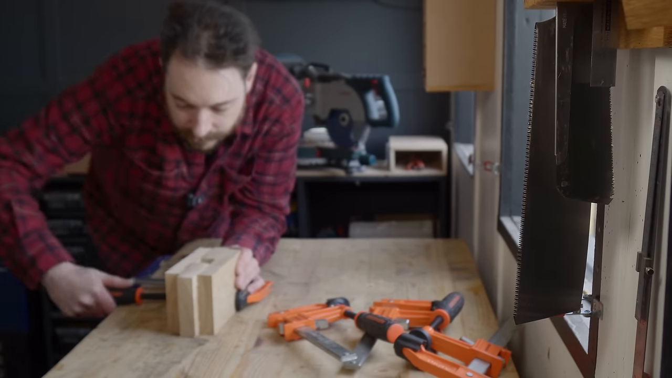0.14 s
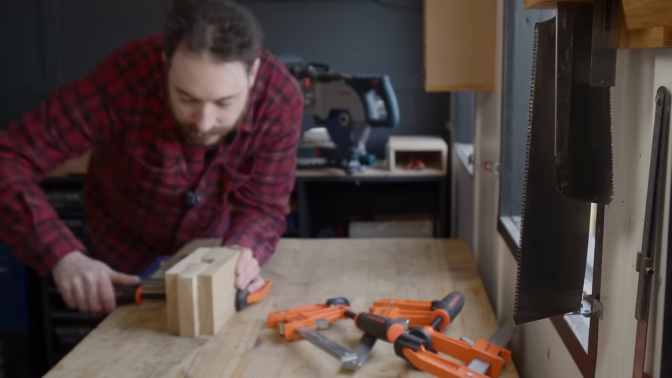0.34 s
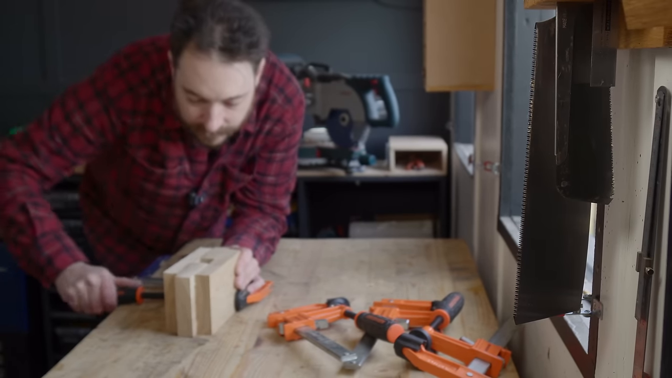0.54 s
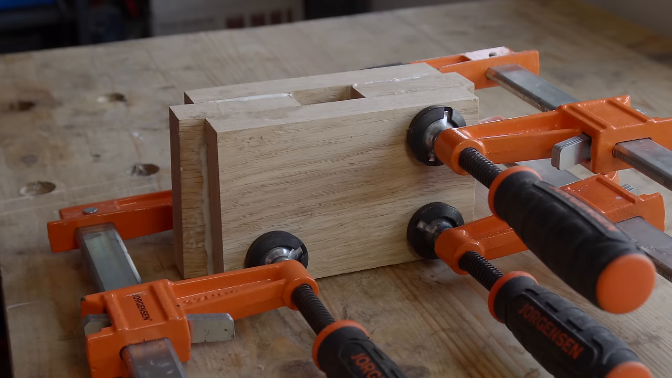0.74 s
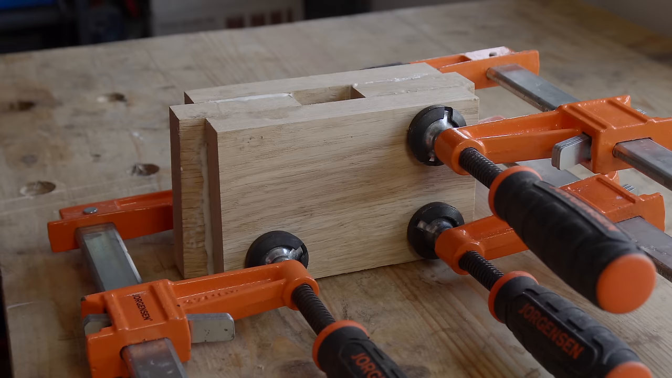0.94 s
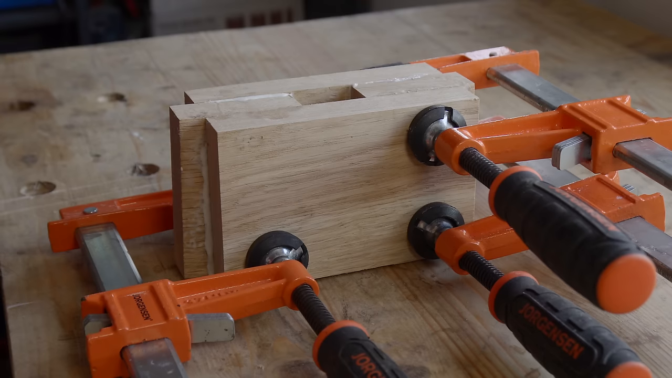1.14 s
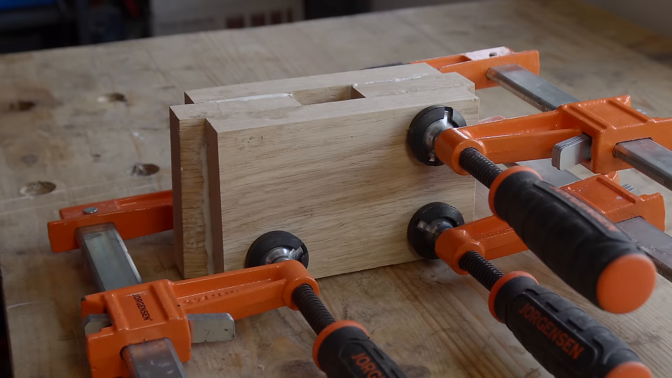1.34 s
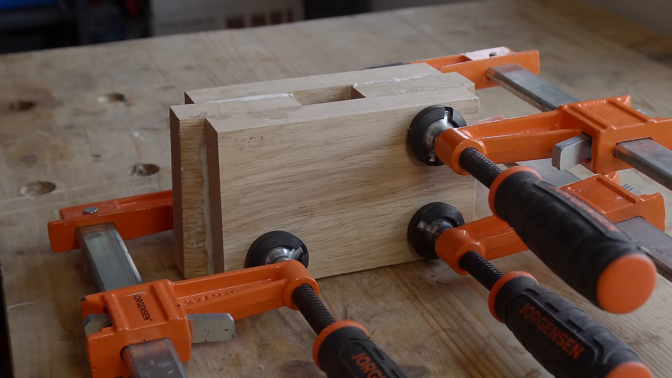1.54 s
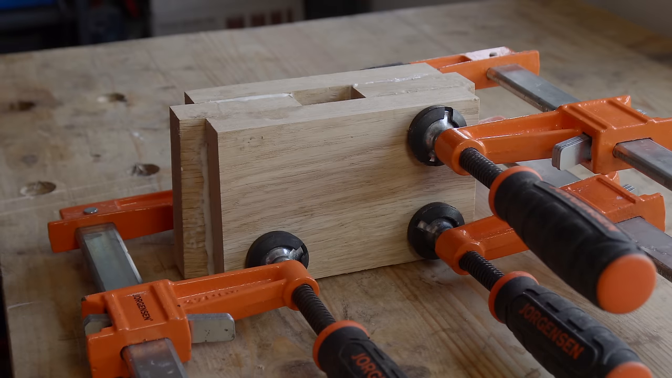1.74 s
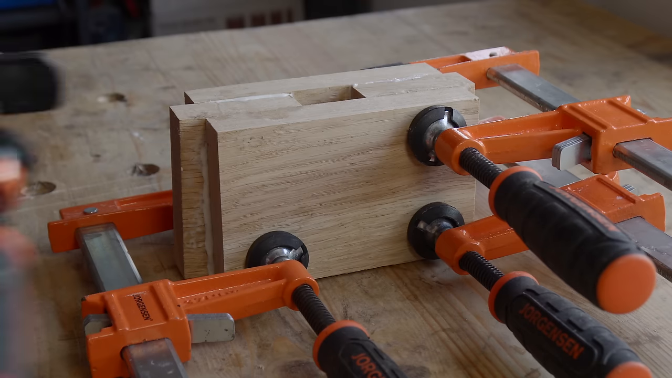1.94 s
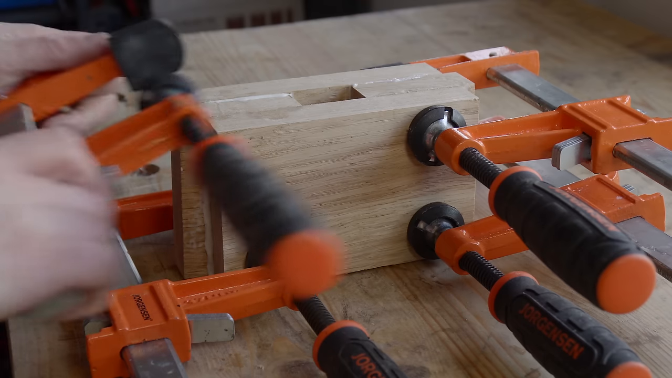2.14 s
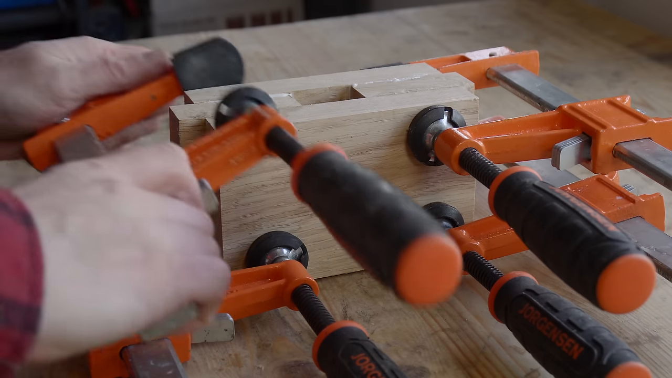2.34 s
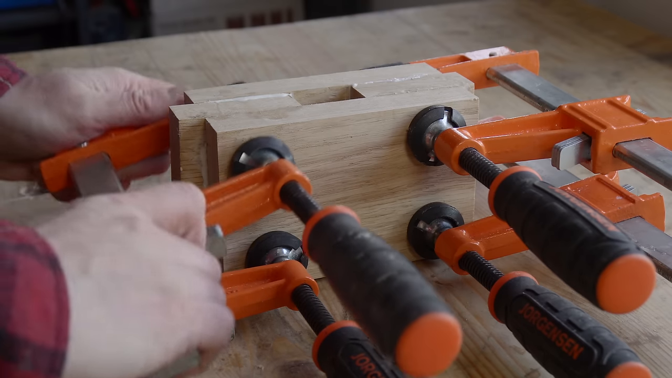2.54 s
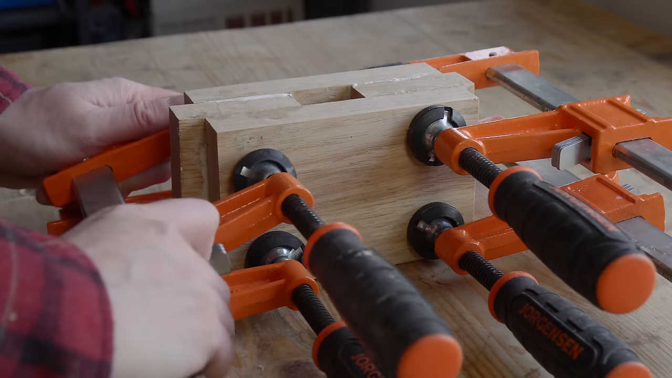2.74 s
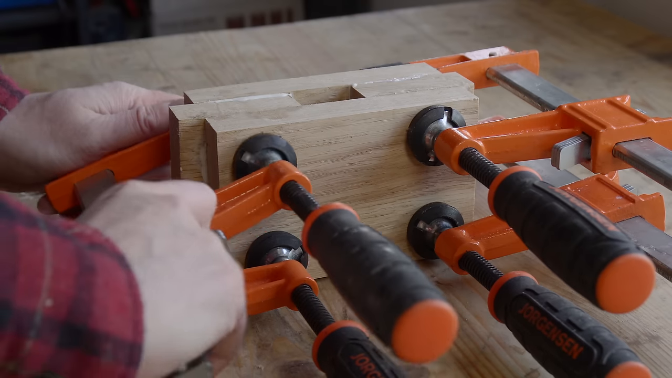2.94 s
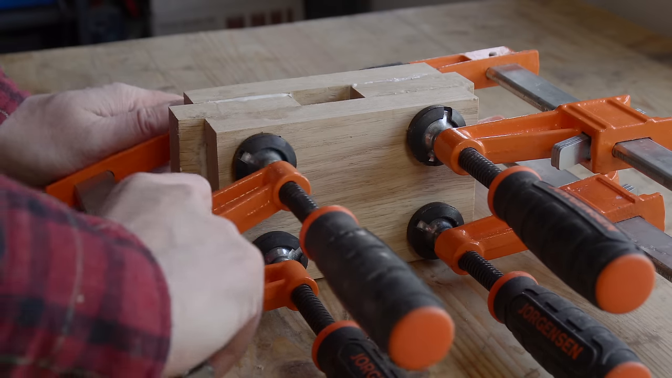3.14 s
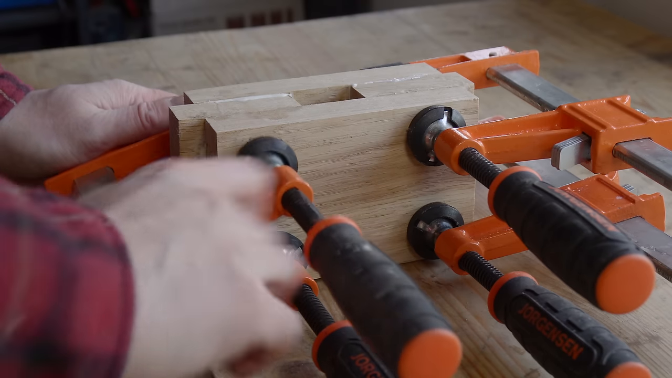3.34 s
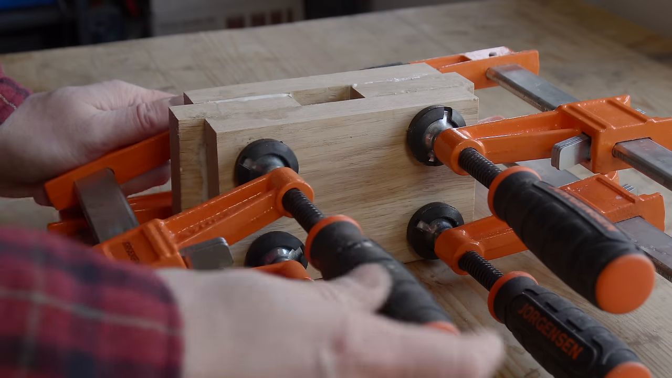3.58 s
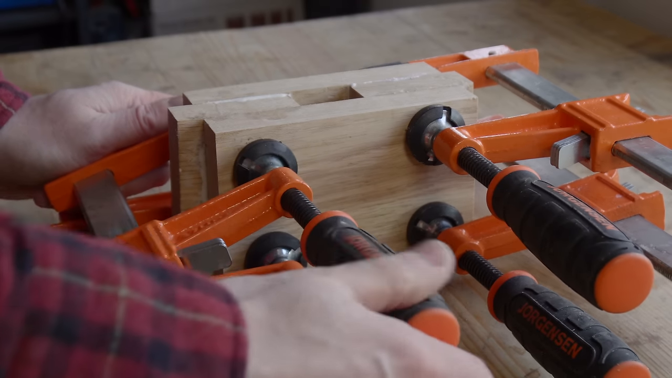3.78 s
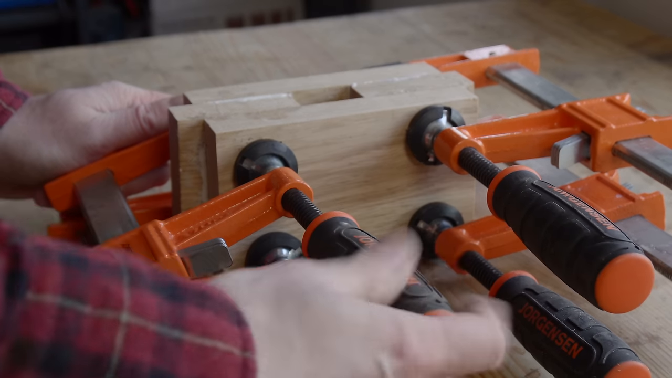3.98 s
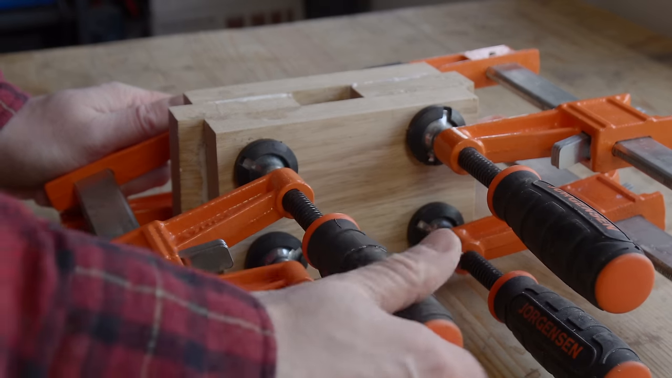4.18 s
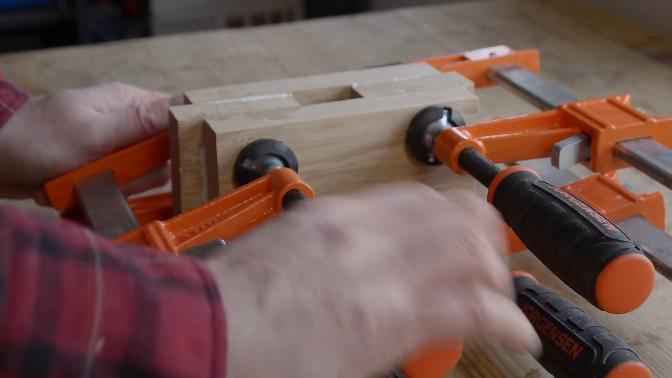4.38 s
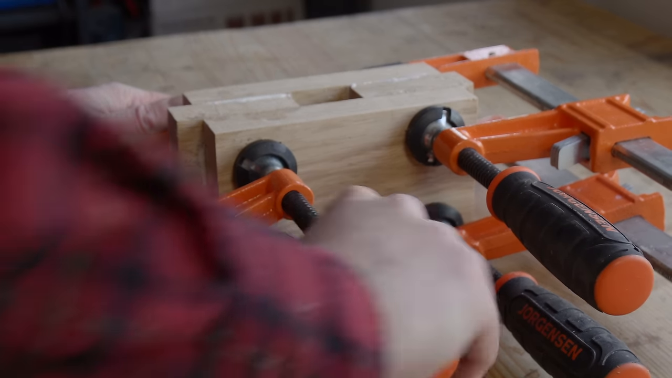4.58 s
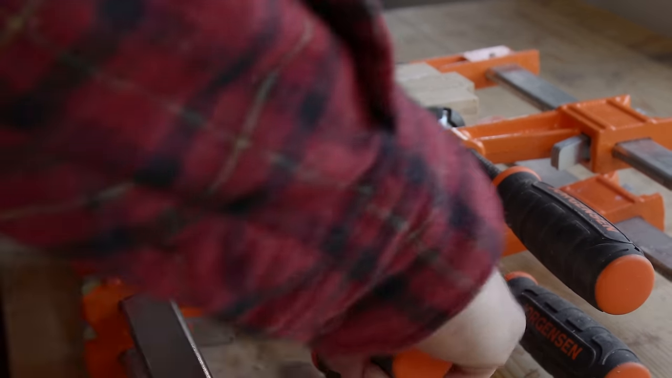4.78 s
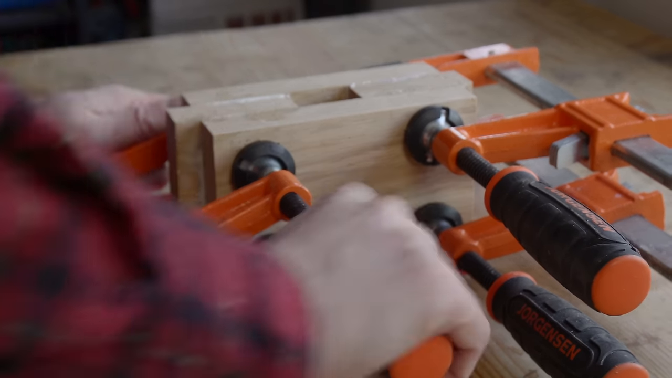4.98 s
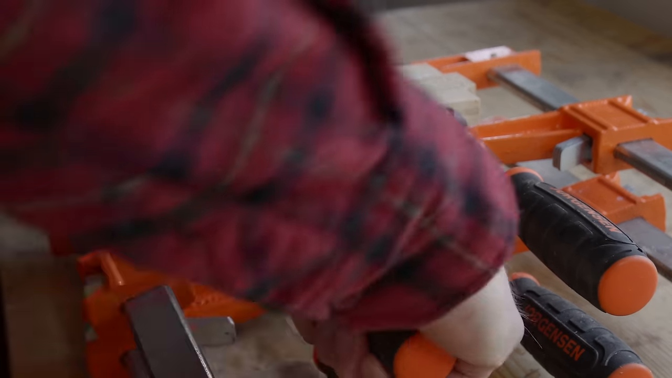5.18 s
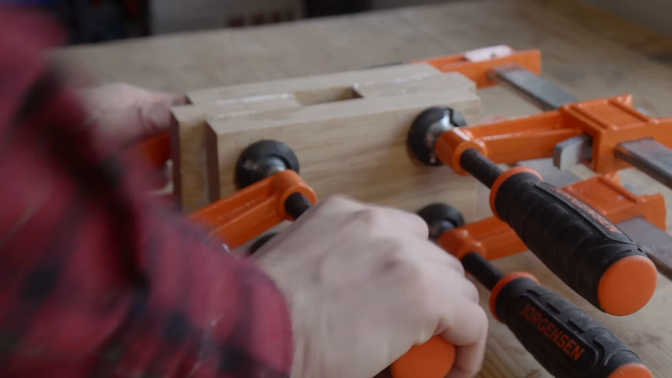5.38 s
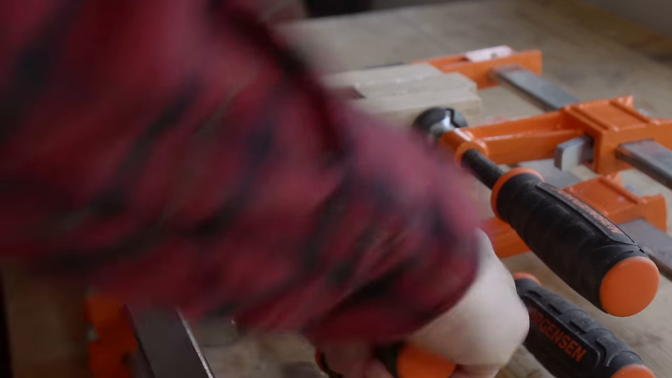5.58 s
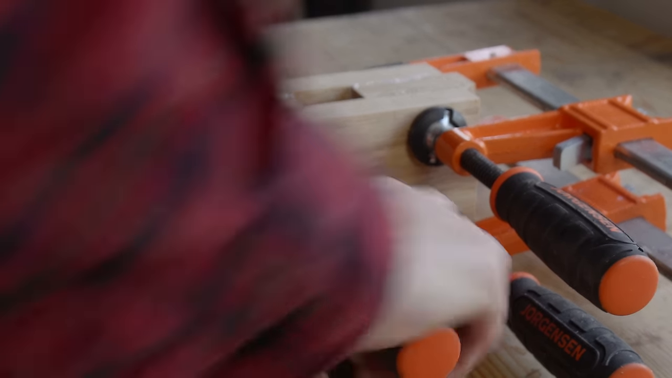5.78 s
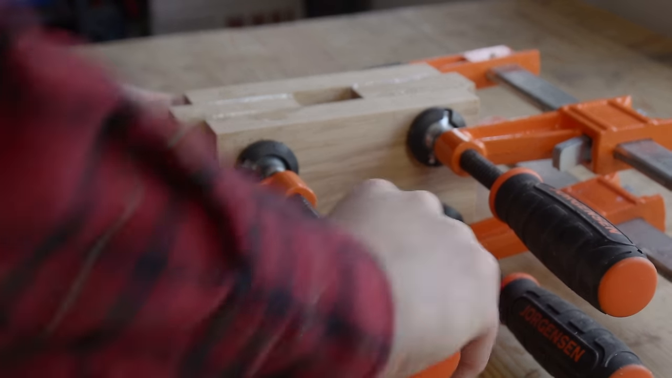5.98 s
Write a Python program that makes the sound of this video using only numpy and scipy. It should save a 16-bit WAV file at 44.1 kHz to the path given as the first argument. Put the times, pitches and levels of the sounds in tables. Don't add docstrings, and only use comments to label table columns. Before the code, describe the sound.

Faint rubbing and a low squeak open the scene, then steel bars chatter and drag on one another a little way off. Wood knocks follow, and a sliding jaw clanks home, the loudest moment, with a brief bright ring. After one more firm tap come close skin and cloth rubs, tiny squeaks, a sharp click, bench rumble and three muted wooden slips. Short, diffuse workshop room; the hands are near the microphone.

```python
import sys
import numpy as np
from scipy import signal
from scipy.fft import rfft, irfft
from scipy.io import wavfile
from scipy.ndimage import uniform_filter1d

SR = 44100
rng = np.random.default_rng(int(sys.argv[2]) if len(sys.argv) > 2 else 0)


def unload_wav(signal):
    wavfile.write(
        sys.argv[1],
        SR,
        np.round(np.clip(np.atleast_2d(signal).T, -1, 1) * 32767).astype(np.int16),
    )


def magnitude_from_level(level_db):
    exponent = np.asarray(level_db, float) / 20
    return 10 ** exponent


N = 265614
HEAP_UNTIL_S, GRIPPED_FROM_S = 2.2, 3.5


def rms_one(x):
    return x / np.sqrt(np.mean(x ** 2) + 1e-20)


def filtered(x, order, cut_hz, kind):
    return signal.sosfilt(signal.butter(order, cut_hz, kind, fs=SR, output="sos"), x)


def at_hz(points, hz):
    points_hz, values = np.transpose(points)
    return np.interp(np.log(hz), np.log(points_hz), values)


def coloured(x, spectrum):
    hz = np.maximum(np.fft.rfftfreq(len(x), 1 / SR), 1)
    return rms_one(irfft(rfft(x) * magnitude_from_level(at_hz(spectrum, hz)), len(x)))


def tilted(x, tilt_db, hinge_hz):
    low = filtered(x, 2, hinge_hz, "low")
    return magnitude_from_level(-tilt_db) * low + magnitude_from_level(tilt_db) * (x - low)


def ring(clicks, hz, t60):
    r, w = magnitude_from_level(-60 / (t60 * SR)), 2 * np.pi * hz / SR
    return signal.lfilter([0, np.sin(w)], [1, -2 * r * np.cos(w), r * r], clicks + 1e-18)


def body(drive, modes):
    return sum((-1) ** k * magnitude_from_level(db) * ring(drive, hz, t60) for k, (hz, db, t60) in enumerate(modes))


def click(s, db):
    return magnitude_from_level(db) * (np.arange(N) == int(s * SR)) + 1e-18


def grains(per_s, spread_db):
    sizes = magnitude_from_level(spread_db * np.minimum(rng.exponential(1, N), 5)) * rng.choice([-1, 1], N)
    return sizes * (rng.random(N) < per_s / SR)


def flutter(per_s, depth_db):
    steps = rng.standard_normal(1000)
    return magnitude_from_level(depth_db * np.interp(np.arange(N) / SR * per_s, np.arange(1000), steps))


def strokes(rows):
    t = np.arange(0, N + 32, 32) / SR
    gain = 0
    for s, db, rise, fall in rows:
        progress = np.where(t < s, (s - t) / rise, (t - s) / fall)
        gain = gain + magnitude_from_level(db - 20 * progress ** 1.3)
    return np.interp(np.arange(N) / SR, t, gain)


def by_stage(heap_db, block_db, gripped_db):
    t = np.arange(N) / SR
    return magnitude_from_level(np.select([t < HEAP_UNTIL_S, t < GRIPPED_FROM_S], [heap_db, block_db], gripped_db))


# hz, level_db
AIR = [(12, -25), (20, -3.5), (43, -3.5), (434, -2.5), (738, -0.5), (1330, -8.5), (6180, -18.5),
       (7310, -16.5), (14300, -25), (16000, -42)]


def room_tone():
    return magnitude_from_level(-75.5) * coloured(rng.standard_normal(N), AIR)


# peak_s, rocking_db
LEANS = [(.1, -65), (.6, -63.5), (.78, -60.5), (2.73, -54.5), (3.11, -43), (3.401, -53.5), (3.62, -58),
         (3.92, -62), (4.18, -50.5), (4.449, -60.5), (4.65, -51.5), (4.83, -51), (5.131, -43), (5.302, -58),
         (5.581, -46), (5.739, -55), (6.02, -44.5)]


def bench_rocking():
    sway = ring(rng.standard_normal(N), 28.6, 0.93)
    sway = sway / np.sqrt(uniform_filter1d(sway ** 2, size=3000) + 1e-9)
    rocking = sway + magnitude_from_level(-13.0) * rms_one(ring(rng.standard_normal(N), 32, 0.21))
    shudder = rms_one(ring(rng.standard_normal(N), 74, 0.45))
    rocking += by_stage(-16, -23, -11.5) * shudder
    rise_s, fall_s, at_rest_db = 0.13, 0.18, -79.5
    lean = magnitude_from_level(at_rest_db) + strokes([(s, db, rise_s, fall_s) for s, db in LEANS])
    return lean * rms_one(rocking)


# pitch_hz, level_db, t60_s
WOOD = [(99, -13.5, 0.99), (142, -29, 0.11), (190, -6.5, 0.036), (202, -3, 0.28), (236, -11, 0.089),
        (275, -1.5, 0.19), (315, -2.5, 0.092), (362.8, -3.5, 0.087), (460, -12, 0.008), (514, -4.5, 0.12),
        (554, -3, 0.038), (670, 1, 0.037), (794, -8.5, 0.068), (883, -13, 0.18), (1048.7, -15.5, 0.051),
        (1220, -12, 0.03)]
# peak_s, level_db, rise_s, fall_s
SHIFTS = [(0.03, -58.5, 0.33, 0.12), (.19, -65.5, 0.21, 0.63), (1.07, -60.5, 0.093, 0.41),
          (1.5, -74.5, 0.16, 0.89), (2.62, -70, 0.15, 0.28), (2.97, -55, 0.13, 0.084),
          (3.08, -41, 0.073, 0.027), (3.36, -64, 0.038, 0.03), (3.44, -49.5, 0.056, 0.12),
          (3.75, -61.5, 0.21, 0.47), (4.09, -63, 0.062, 0.37), (4.58, -57.5, 0.14, 0.31),
          (4.86, -72, 0.077, 0.09), (4.99, -60.5, 0.15, 0.24), (5.27, -54, 0.36, 0.16),
          (5.67, -48, 0.28, 0.22), (5.9, -61, 0.16, 0.44)]


def block_shifts():
    stutter = grains(2500, spread_db=2.0) * flutter(30, depth_db=2.5)
    rubbing = sum(magnitude_from_level(db) * ring(stutter, hz, 0.69 * t60) for hz, db, t60 in WOOD)
    return magnitude_from_level(-4.5) * strokes(SHIFTS) * rms_one(rubbing)


# hz, density_db per Hz
PALM = [(880, -34.5), (1500, -8.5), (2000, -13), (3030, -4), (3380, -7), (7610, -6), (9850, -11.5),
        (14500, -12.5), (16000, -23.5)]
# peak_s, level_db, rise_s, fall_s
RUBS = [(0.0, -79, 0.29, 0.17), (.168, -81, 0.018, 0.073), (.51, -77.5, 0.26, 0.11),
        (.628, -84, 0.012, 0.058), (.73, -70, 0.048, 0.25), (2.24, -78.5, 0.93, 0.18),
        (3.34, -74, 0.081, 0.28), (3.69, -72, 0.066, 0.067), (3.79, -72, 0.076, 0.097),
        (3.87, -74, 0.081, 0.066), (3.975, -74, 0.02, 0.036), (4.08, -68, 0.017, 0.041),
        (4.13, -73.5, 0.017, 0.09), (4.195, -68.5, 0.059, 0.032), (4.27, -68, 0.046, 0.11),
        (4.375, -60, 0.035, 0.037), (4.5, -68, 0.053, 0.067), (4.6, -61.5, 0.075, 0.096),
        (4.8, -67, 0.11, 0.056), (5.18, -75.5, 0.16, 0.11)]
# start_s, effort_db
TURNS = [
    (5.055, -0.5),
    (5.508, 1),
    (5.976, 2),
]
# after_turn_s, level_db, rise_s, fall_s
TURN = [
    (-.15, -64.5, 0.052, 0.12),
    (0., -61, 0.027, 0.088),
]


def palm_rubs():
    rubs = list(RUBS)
    for s, effort_db in TURNS:
        rubs += [(s + lead, db + effort_db, rise, fall) for lead, db, rise, fall in TURN]
    palm = coloured(grains(12000, spread_db=1.5) * flutter(60, depth_db=2.5), PALM)
    return magnitude_from_level(1.5) * strokes(rubs) * tilted(palm, -1, 5200)


# peak_s, level_db, rise_s, fall_s
SCUFFS = [(0.0, -64.5, 0.12, 0.18), (.17, -63, 0.083, 0.14), (.51, -58.5, 0.091, 0.11),
          (.627, -57, 0.0063, 0.054), (.8, -64, 0.2, 0.15), (2.0, -70, 0.48, 0.67), (3.7, -69, 0.27, 0.94),
          (4.1, -79.5, 0.059, 0.53), (4.36, -67, 0.1, 0.12), (4.55, -68.5, .1, 0.24),
          (4.82, -65.5, 0.1, 0.071), (5.22, -66.5, 0.23, 0.28), (5.287, -58.5, 0.0063, 0.074),
          (5.757, -52.5, 0.013, 0.087), (6.0, -64, 0.1, .1)]


def grip_scuffs():
    jerks = grains(5000, spread_db=2.5) * flutter(50, depth_db=1.5)
    return magnitude_from_level(-8.0) * strokes(SCUFFS) * rms_one(filtered(jerks, 2, [700, 1900], "band"))


# start_s, length_s, pitch_hz, width_hz, level_db
SQUEAKS = [(0.066, 0.029, 1470, 52, -69), (0.12, 0.38, 1500, 52, -76.5), (0.096, 0.18, 430, 60.4, -64.5),
           (0.147, 0.59, 2990, 120, -85.5), (3.569, 0.53, 1720, 121.2, -73), (3.6, 0.5, 2186, 149.4, -76.5),
           (4.614, 0.13, 2650, 303, -75.5), (4.886, 0.058, 3030, 296, -66.5), (5.28, 0.093, 1304, 90, -70),
           (5.339, 0.057, 2980, 399, -65.5), (5.482, 0.11, 2790, 300, -67.5), (5.758, 0.093, 1282, 69, -65)]


def screw():
    thread, t = grains(3200, spread_db=1.5) * flutter(40, depth_db=2.5), np.arange(N) / SR
    out = np.zeros(N)
    for s, length, hz, width, db in SQUEAKS:
        t60 = 1.2 / width
        squeak = rms_one(ring(ring(thread, hz, t60), hz, t60))
        swell = np.sin(np.pi * np.sqrt(np.clip((t - s) / length, 0, 1)))
        out += magnitude_from_level(db) * swell * squeak
    return out


# start_s, peak_db, loudest_pitch_hz, judder_ms
KNOCKS = [(0.466, -53.5, 600, 16), (0.494, -49.5, 296, 59), (0.528, -47.5, 290, 18), (0.623, -44, 332, 11),
          (1.027, -44, 1090, 19), (2.518, -42, 1037, 29), (2.52, -51, 250, 20), (2.621, -40, 265, 14.5),
          (2.847, -47, 262, 15), (2.923, -38, 282, 23), (2.976, -32.5, 257, 12), (3.002, -24, 347, 19),
          (3.408, -33.5, 560, 12.6), (3.41, -37, 197, 26), (3.738, -53, 202, 10.5), (4.065, -46.5, 205, 18),
          (4.351, -48, 286, 9.2), (4.355, -42, 1070, 36), (4.374, -39.5, 212, 16), (4.52, -41, 291, 9.6),
          (4.822, -50.5, 257, 6.4), (4.925, -46.5, 171, 6.5), (5.432, -43, 514, 9.5),
          (5.845, -44.5, 280.4, 5.8)]


def knocks():
    t, drive = np.arange(4096) / SR, np.zeros(N)
    for s, peak_db, top_hz, ms in KNOCKS:
        judder = rng.standard_normal(4096) * np.exp(-1000 * t / ms)
        force = (t == 0) + 0.059 * judder
        blow = filtered(force, 2, [top_hz / 2.0, top_hz * 1.89], "band")
        drive[int((s + .003) * SR):][:4096] += magnitude_from_level(peak_db) * blow
    thud = sum(magnitude_from_level(db - 9.5) * ring(drive, hz, 0.34 * t60) for hz, db, t60 in WOOD)
    return filtered(thud + magnitude_from_level(-15.5) * body(drive, WOOD), 3, [125, 1350], "band")


# pitch_hz, level_db
STEEL = [(1580, -13.5), (1860, -21), (2040, -12.5), (2480, -5), (2800, -3), (3100, -3.5), (3680, -14.5),
         (4280, -4), (4660, 2.5), (5220, -4.5), (5490, -9.5), (6050, -3), (6620, -3.5), (7170, -3.5),
         (7650, -5), (7950, 2), (8610, -2), (9450, 1.5), (10300, -3), (11400, -6.5), (11900, -4),
         (12350, -2.5), (13800, -10.5), (14500, -22)]
# start_s, peak_db, loudest_pitch_hz, treble_fall_db per octave, chatter_ms
HEAP_CLINKS = [(0.4688, -56, 1155, 45, 2.9), (0.6241, -57.5, 2060, 5.5, 7), (0.9946, -37.5, 7050, 15, 2.6),
               (1.1617, -29.5, 4900, 8, 0.68), (1.1796, -35.5, 2850, 4, 5.1), (1.1977, -39, 2560, 13, 2.4),
               (1.2682, -29.5, 7600, 14.5, 2.5), (1.5, -44, 3080, 7, 4.8), (1.539, -36.5, 2610, 3.5, 0.44),
               (1.5613, -44.5, 2950, 3.5, 2.3), (1.671, -56, 4860, 11, 2.8), (1.702, -42, 4900, -1.5, 4.5),
               (1.7489, -32.5, 6400, 1.5, 3.9), (1.7986, -28, 3300, 7, 0.77),
               (1.8315, -29.5, 2420, 6.5, 1.04), (1.8357, -32, 4510, 3.5, 1.4),
               (1.8508, -43.5, 2370, 7, 1.9)]
# start_s, peak_db, loudest_pitch_hz, treble_fall_db, chatter_ms
BLOCK_CLINKS = [(2.524, -56.5, 2800, 8, 1.4), (2.5456, -53.5, 2990, 10, 4.5), (2.572, -49.5, 2690, 10, 1.3),
                (2.5927, -51.5, 3180, 15, 2.2), (2.6276, -46, 2470, 3, 3.1), (2.851, -23, 4110, 6.5, 1.8),
                (2.8559, -25.5, 6660, -1, 4.8), (2.915, -47.5, 4270, 6, 2.5), (2.9155, -46.5, 1190, 9, 1.8),
                (2.9364, -40.5, 3980, 13, 1.9), (2.9523, -18.5, 4000, -2, 5), (3.0052, -3.5, 11400, 7, 1.7),
                (3.0098, -12.5, 11500, 15.5, 2.6), (3.4111, -34.5, 6330, 33, 1.4),
                (3.411, -33, 1525, 12.5, 4.7), (4.1833, -43.5, 1924, 3, 1.44),
                (4.7398, -50.5, 2000, 5.5, 2.25), (4.778, -40.5, 4300, 5.5, 1.2),
                (4.7812, -46.5, 3000, 5.5, 3.3), (5.1164, -45, 4810, 24.5, 2.2),
                (5.6512, -51.5, 4300, 3, 2.2), (5.655, -48, 3000, 6.5, 4)]
# start_s, peak_db, loudest_pitch_hz, treble_fall_db per octave
BOUNCES = [(1.0298, -15, 4400, 5), (1.0303, -9, 11700, 5), (1.0326, -3, 11700, 5), (1.038, -14, 9500, 5),
           (1.0434, -15, 9500, 5), (1.0542, -12, 11600, 5), (1.0672, -13, 5000, 4), (1.0786, -12, 5240, 9),
           (1.0885, -20, 4560, 9), (1.0985, -19, 5420, 7), (1.1108, -19, 3200, 6), (1.1263, -20, 2600, 4),
           (1.2935, -21, 5200, 9), (1.298, -21, 6000, 9)]
# start_s, peak_db, loudest_pitch_hz
CATCHES = [(1.191, -28.5, 4600), (1.214, -37, 2500), (1.2272, -38, 5000), (1.2439, -26, 3550),
           (1.2526, -18.5, 2480), (1.278, -25, 3850), (1.2882, -15, 8000), (1.2907, -27, 4630),
           (1.3053, -18.5, 3600), (1.321, -27, 6170), (1.335, -20, 4570), (1.343, -23, 5260),
           (1.509, -45.5, 6800), (1.516, -47, 1305), (1.531, -39, 2950), (1.55, -37.5, 4600),
           (1.577, -47, 2000), (1.587, -48, 1480)]
# start_s, peak_db, loudest_pitch_hz, treble_fall_db per octave, chatter_ms
RATTLES = [(1.7956, -36.5, 1900, 3, 5), (2.9706, -14.5, 6200, -2, 3.5), (2.9716, -15, 9700, 6, 3),
           (2.976, -18, 4140, -0.5, 3), (2.9821, -13, 6100, 3, 2), (2.9817, -16.5, 11300, 8.5, 2),
           (2.9928, -8, 11600, 6, 1.8), (2.9966, -10.5, 6100, 3, 1.3)]


def bar_contacts():
    t, hz = np.arange(2048) / SR, np.maximum(np.fft.rfftfreq(2048, 1 / SR), 1)
    out = np.zeros(N)
    bounces = [(*row, 0.85) for row in BOUNCES]
    catches = [(*row, 4.0, 0.8) for row in CATCHES]
    contacts = [(*row, .14) for row in [*HEAP_CLINKS, *BLOCK_CLINKS, *bounces, *catches]]
    contacts += [(*row, 1.8) for row in RATTLES]
    modes = rfft([magnitude_from_level(db - 26.0) * ring(t == 0, mode_hz, 0.012) for mode_hz, db in STEEL])
    answer = by_stage(-6, -5.5, -14)
    for s, peak_db, top_hz, fall_db, ms, rise_ms in contacts:
        octaves = np.log2(hz / top_hz)
        slope_db = np.where(octaves > 0, -abs(fall_db), 4.5) * octaves
        colour_db = slope_db + 12.0 * np.exp(-(octaves / 0.097) ** 2)
        rise = np.minimum(1000 * t / rise_ms, 1)
        decay = np.exp(-1000 * np.maximum(t - rise_ms / 1000, 0) / ms)
        burst = irfft(rfft(rng.standard_normal(2048)) * magnitude_from_level(colour_db)) * rise * decay
        strike = magnitude_from_level(4.0 * rng.standard_normal(len(STEEL)))
        clack = answer[int(s * SR)] * strike @ modes
        sound = irfft(rfft(burst) * (magnitude_from_level(-3.0) + clack))
        out[int(s * SR):][:2048] += magnitude_from_level(peak_db) / np.abs(burst).max() * sound
    return out


# start_s, pitch_hz, level_db, t60_s, free_s
RINGS = [(1.0313, 11700, -31, .12, .3), (1.7489, 10810, -57, .4, .047), (1.945, 10810, -79, .8, .06),
         (2.972, 9496, -43, .13, .3), (2.985, 6051, -43, .2, .3), (2.9962, 11400, -36, .12, .3),
         (3.004, 2170, -43, .2, .3), (3.006, 11490, -34, .12, .3), (3.006, 4280, -44, .18, .3),
         (3.006, 5895, -45, .17, .3), (3.006, 6616, -46, .15, .3), (3.006, 8080, -45, .12, .3),
         (3.4111, 2030, -49, .2, .3), (3.4111, 2078, -55, .2, .3)]


def hanging_bars():
    out, n = np.zeros(N), np.arange(16384)
    for s, hz, db, t60, free_s in RINGS:
        untouched = np.clip((free_s - n / SR) / 0.0044, 0, 1)
        out[int(s * SR):][:16384] += untouched * ring(magnitude_from_level(db) * (n == 9), hz, t60)
    return out


def clinks():
    steel, t = bar_contacts() + hanging_bars(), np.arange(N) / SR
    late_heap = (t > 1.72) & (t < HEAP_UNTIL_S)
    return np.where(late_heap, filtered(steel, 3, 1350, "high"), filtered(steel, 3, 650, "high"))


# hz, density_db per Hz
SCRAPE = [(150, -54.5), (300, -12), (447, -3.5), (2400, 2), (3400, 0.5), (6100, -3.5), (8640, -6),
          (11500, -11.5), (16000, -14)]
# peak_s, level_db, rise_s, fall_s, tilt_db
SLIDES = [(1.036, -18.5, 0.0069, 0.016, 3.5), (1.051, -37, 0.012, 0.12, 16), (1.2, -41, 0.037, 0.32, -8),
          (1.311, -24, 0.11, 0.067, 4.5), (1.5, -49, 0.0039, 0.14, -8.5), (1.557, -52.5, 0.043, 0.058, -3),
          (1.699, -48.5, 0.016, 0.025, -6.5), (2.93, -49.5, 0.081, 0.021, -0.5),
          (3.008, -19, 0.042, 0.0049, -1.5)]
# peak_s, level_db, rise_s, fall_s
LOOSE = [
    (1.293, -39, .014, .06),
    (1.325, -42, .04, .045),
]
# pitch_hz, level_db, t60_s
SINGING = [(2467, -9, .04), (4620, -12, .05), (7594, -1, .025), (7690, -2, .025), (7950, -4, .05),
           (9450, -8, .015), (11800, -6, .008), (12500, -8, .01)]


def slides():
    impacts = grains(5000, spread_db=2.5) * flutter(250, depth_db=2.2)
    damped = sum(magnitude_from_level(db) * ring(impacts, hz, 0.06) for hz, db in STEEL)
    scrape = coloured(impacts, SCRAPE) + magnitude_from_level(-21.0) * rms_one(damped)
    dragged = sum(strokes([row[:4]]) * tilted(scrape, row[4], 4600) for row in SLIDES)
    loose = strokes(LOOSE) * rms_one(impacts)
    singing = sum(magnitude_from_level(db) * ring(loose, hz, t60) / np.sqrt(t60 * SR / 30) for hz, db, t60 in SINGING)
    return magnitude_from_level(-12.0) * dragged + filtered(singing, 2, 1200, "high")


# start_s, level_db, pitch_hz
SNAPS = [
    (1.961, -60, 2800),
    (4.7743, -36, 3750),
    (5.528, -53, 2600),
    (5.6485, -43, 3900),
]
# share of the pitch, level_db, t60_s
SNAP = [(.3, -3.5, .005), (.5, -3, .004), (1., 0, 0.0057), (1.45, -5.5, 0.0038), (2.1, -7, 0.0031)]


def snaps():
    out, n = np.zeros(N), np.arange(2048)
    rebound_ms, rebound_db = .8, -1.5
    twice = (n == 0) + magnitude_from_level(rebound_db) * (n == int(rebound_ms * SR / 1000))
    for s, db, hz in SNAPS:
        modes = [(share * hz, mode_db, t60) for share, mode_db, t60 in SNAP]
        out[int(s * SR):][:2048] += magnitude_from_level(db) * body(twice, modes)
    return out


# pitch_hz, level_db, t60_s
LANDING = [(177.3, -13.5, 0.36), (275.5, -12.5, 0.23), (528.5, -6.5, 0.12), (683.5, -7.5, 0.093),
           (895, -10.5, 0.037), (1220, -11, 0.034), (1630, -9.5, 0.037), (1736, -11.5, 0.052),
           (2030, 3.5, 0.036), (2500, -4, 0.044), (2790, -6.5, 0.056), (3220, -13.5, 0.045),
           (3720, -16, 0.041), (4300, -14.5, .03)]


def pad_landing():
    return body(filtered(click(3.411, -29.5), 2, 3500, "low"), LANDING)


# pitch_hz, level_db, t60_s
BITE = [(194, -9.5, 2.65), (277, 0, 0.22), (474, -11, 0.82), (665, -18.5, 0.8), (770, -6.5, 0.086),
        (964, -11.5, 0.21), (1211, -13.5, 0.25), (1335, -38, 5.0), (1470, -7, 0.078)]


def pad_bite():
    return body(click(4.354, -44.5), BITE)


# start_s, level_db
SLIPS = [
    (5.0902, -28),
    (5.5365, -27.5),
    (5.9999, -27.5),
]
# pitch_hz, level_db, t60_s
CLAMPED = [(321, 4, 0.025), (176, -12, 0.33), (600, -4.5, 0.028), (202, -16, 0.51), (273.3, -14.5, 0.19),
           (490, -14.5, 0.17), (320.4, -15.5, 0.18), (545, -11, 0.21), (375, -10, 0.14),
           (431.5, -21.5, 0.21), (657, -22.5, 0.126), (758, -23.5, 0.13), (878, -14, 0.038),
           (1000, -30, 0.13)]


def block_slips():
    jolts = sum(click(s, db) for s, db in SLIPS)
    return filtered(body(filtered(jolts, 2, 970, "low"), CLAMPED), 2, 130, "high")


# hz, t60_s
ROOM_T60 = [(150, 0.4), (1000, 0.16), (4000, 0.23), (9000, 0.2), (15000, 0.1)]


def workshop(x):
    t, tail = np.arange(SR // 2) / SR, 0
    for hz in 90 * 2. ** np.arange(8):
        noise = filtered(rng.standard_normal(len(t)), 2, [hz / np.sqrt(2), hz * np.sqrt(2)], "band")
        tail = tail + noise * magnitude_from_level(-60 * t / at_hz(ROOM_T60, hz))
    power = np.abs(rfft(tail)) ** 2
    evening = uniform_filter1d(power, size=600) / uniform_filter1d(power, size=50)
    tail = irfft(rfft(tail) * np.sqrt(evening))
    tail = tail * np.clip((t - .002) / 0.0005, 0, 1)
    tail = tail * np.clip((.4 - t) / .1, 0, 1)
    return signal.fftconvolve(x, tail / np.sqrt(np.sum(tail ** 2)))[:N]


def scene():
    close = room_tone() + bench_rocking() + block_shifts() + palm_rubs() + grip_scuffs() + screw()
    wood = knocks() + block_slips()
    steel = clinks() + slides() + snaps() + pad_landing() + pad_bite()
    steel_to_room = by_stage(-8.5, -10.5, -23) * steel
    wood_to_room = magnitude_from_level(-13) * wood
    return (steel + wood + workshop(steel_to_room + wood_to_room) + close)[None]


def roll_off(x):
    return signal.sosfilt(signal.butter(12, 16600, fs=SR, output="sos"), x)


def record(dry):
    mix = signal.sosfilt(signal.cheby2(10, 60, 16700, fs=SR, output="sos"), dry)
    return roll_off(mix)


dry = scene()
out = record(dry)
unload_wav(out)
```